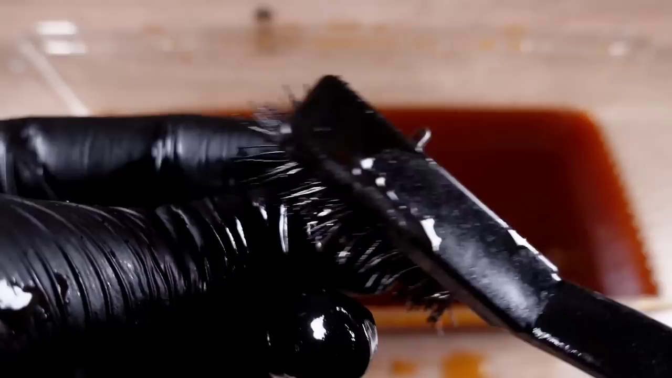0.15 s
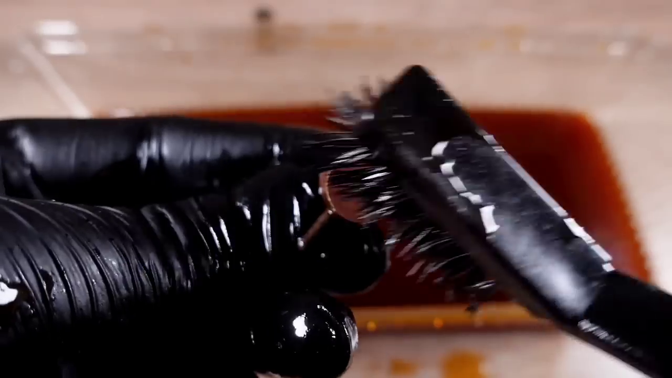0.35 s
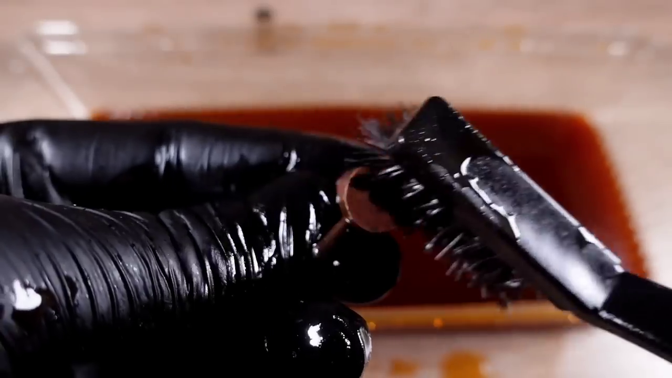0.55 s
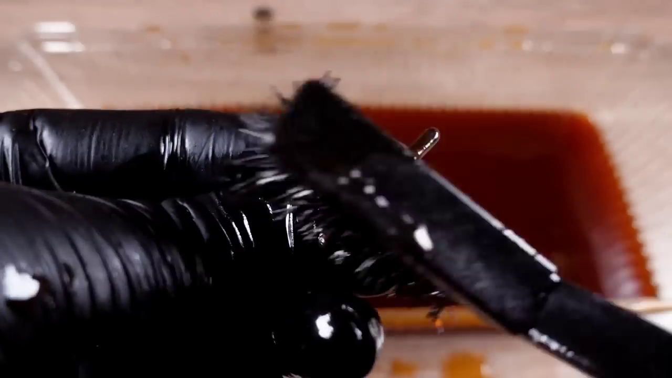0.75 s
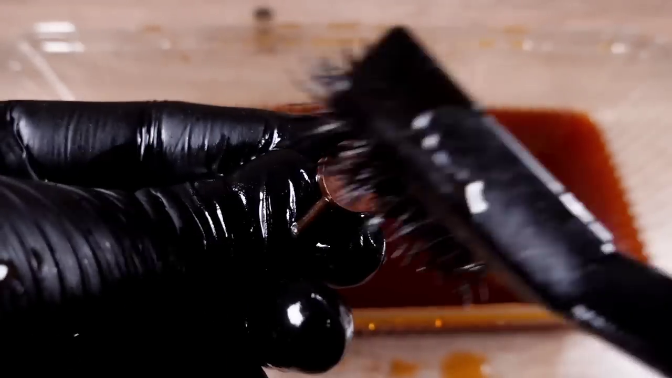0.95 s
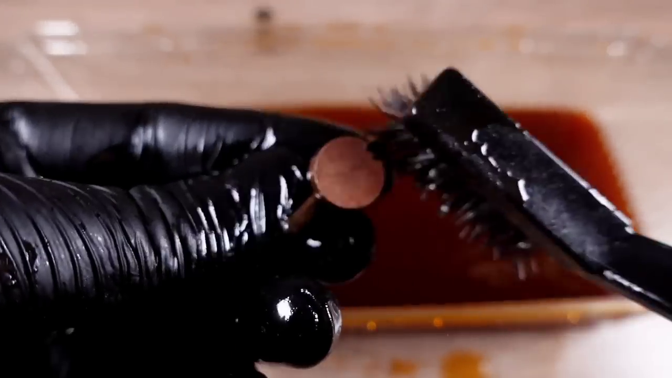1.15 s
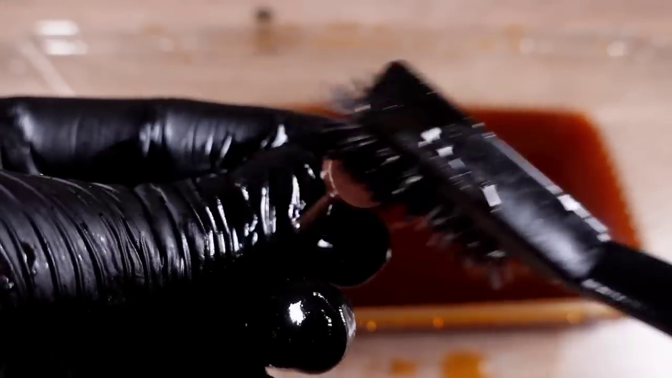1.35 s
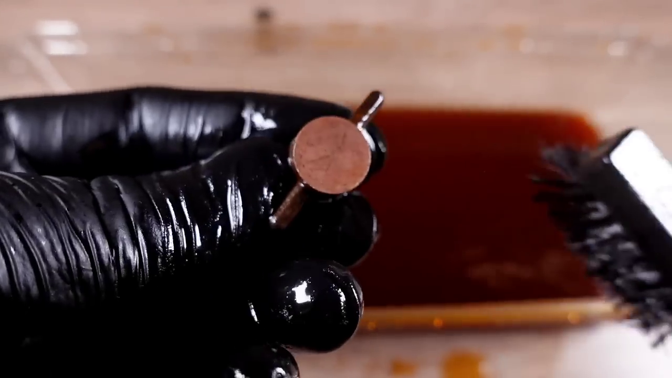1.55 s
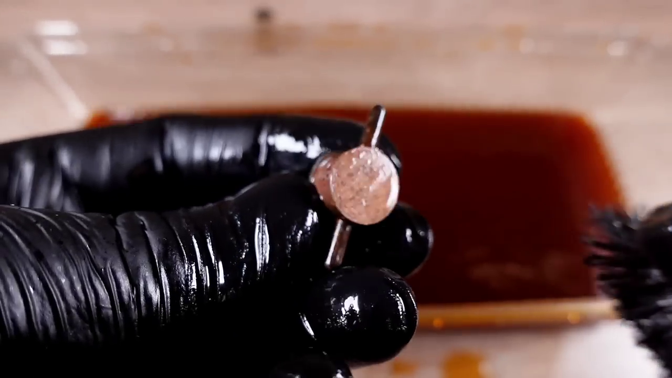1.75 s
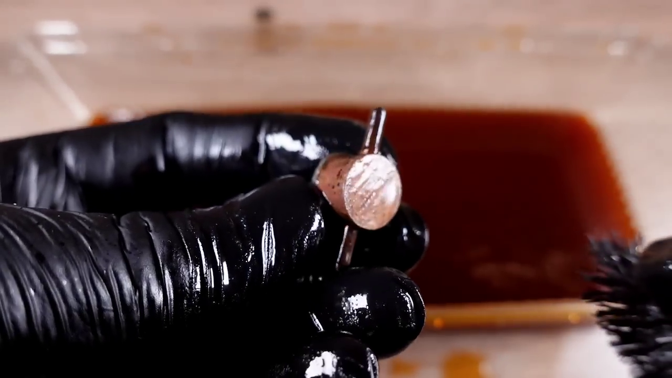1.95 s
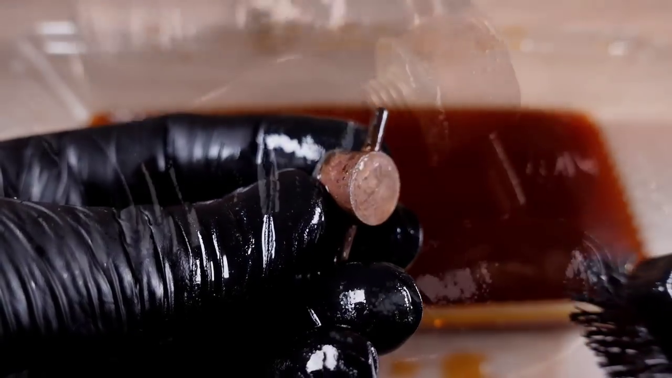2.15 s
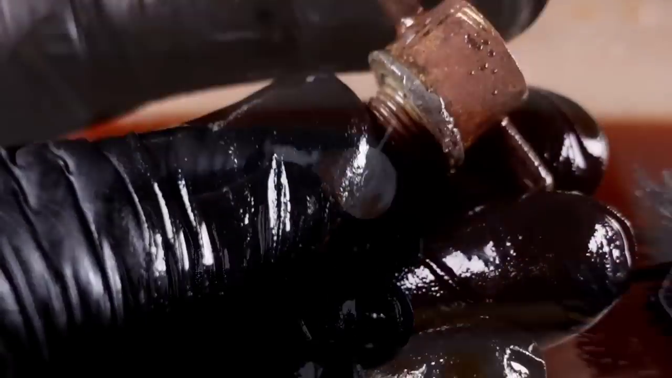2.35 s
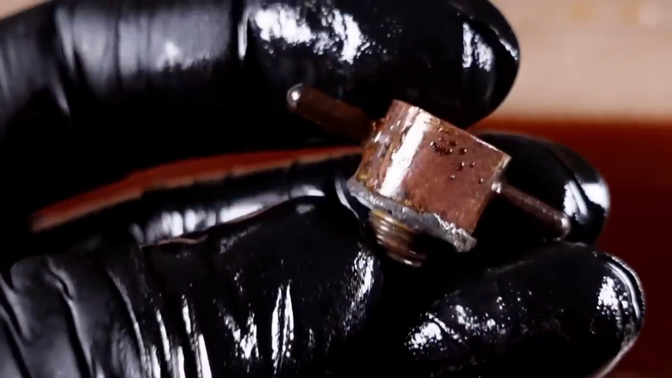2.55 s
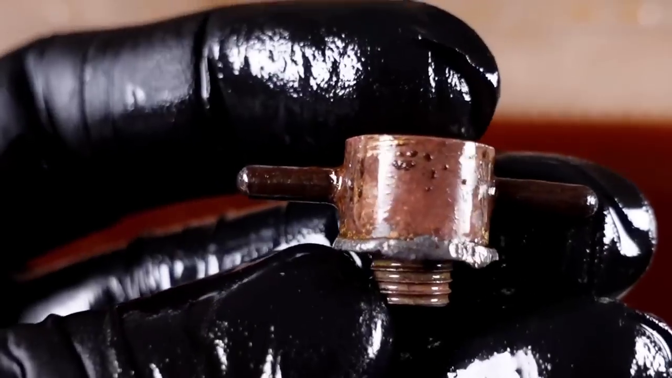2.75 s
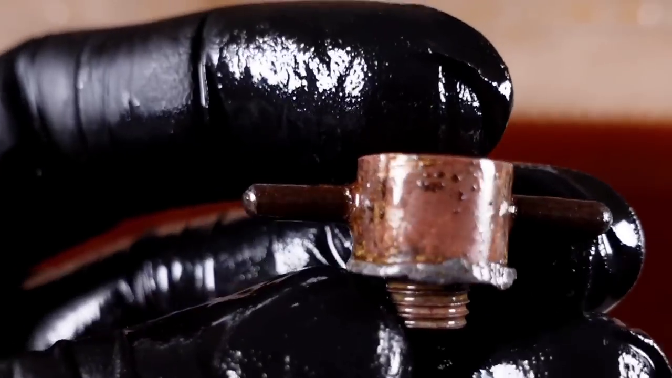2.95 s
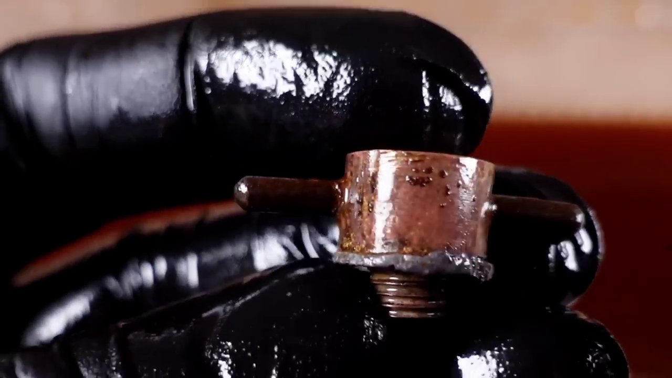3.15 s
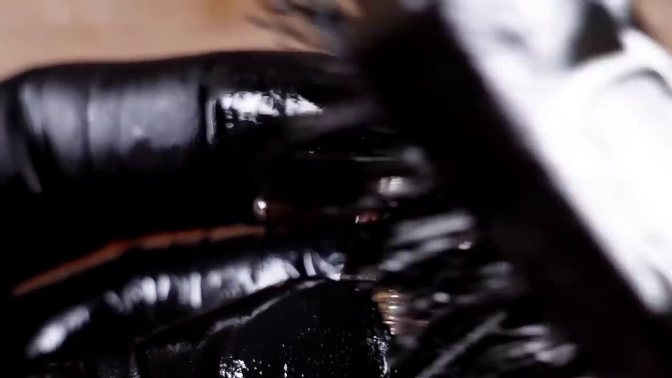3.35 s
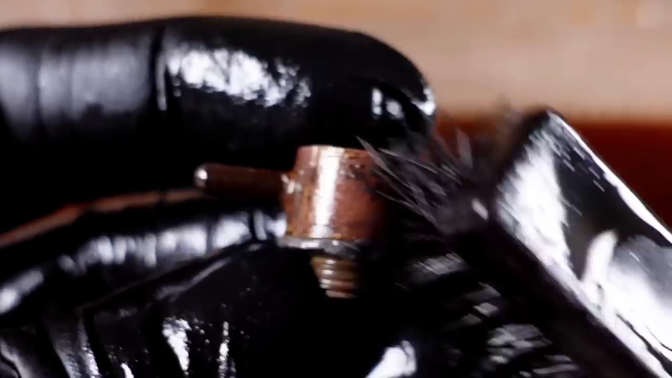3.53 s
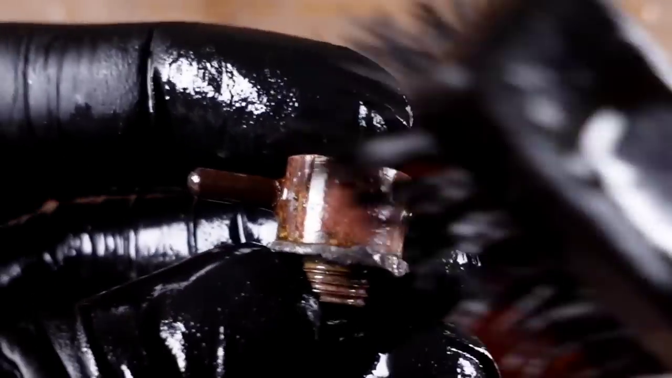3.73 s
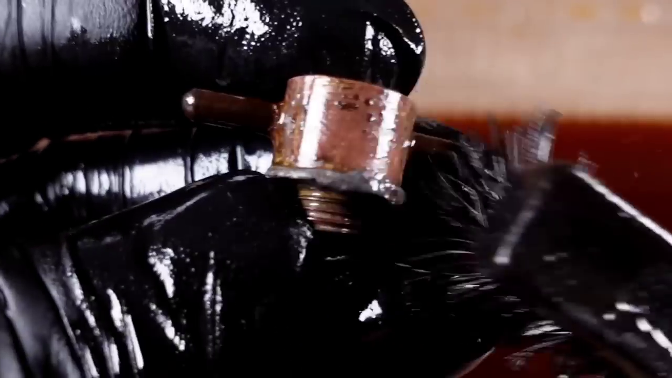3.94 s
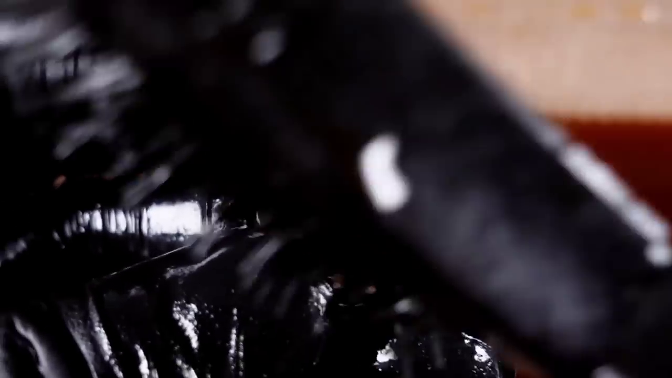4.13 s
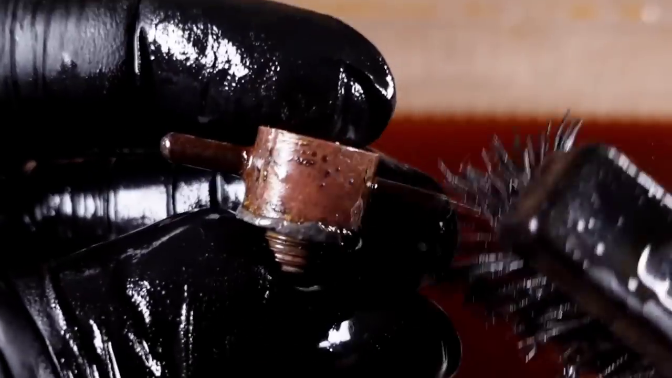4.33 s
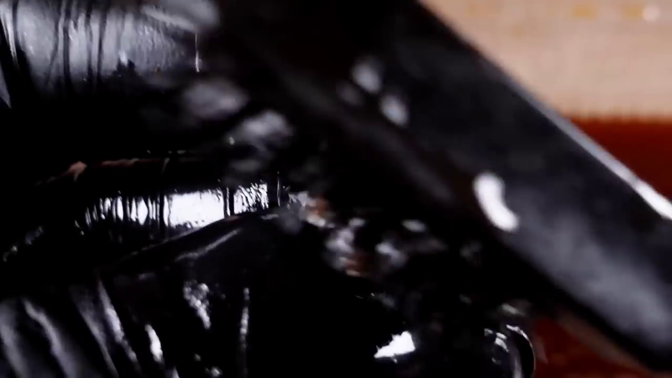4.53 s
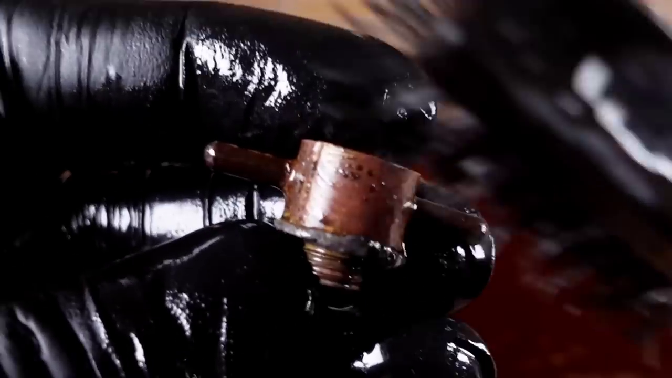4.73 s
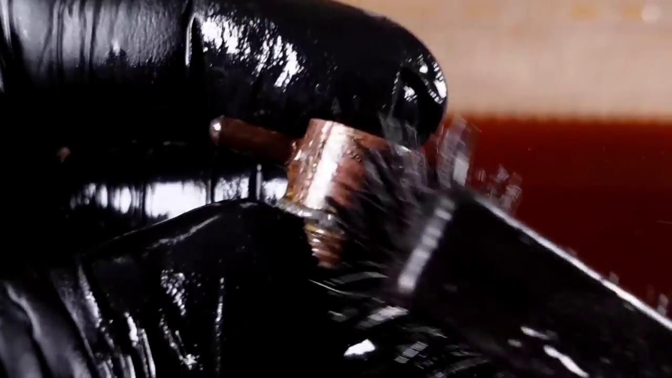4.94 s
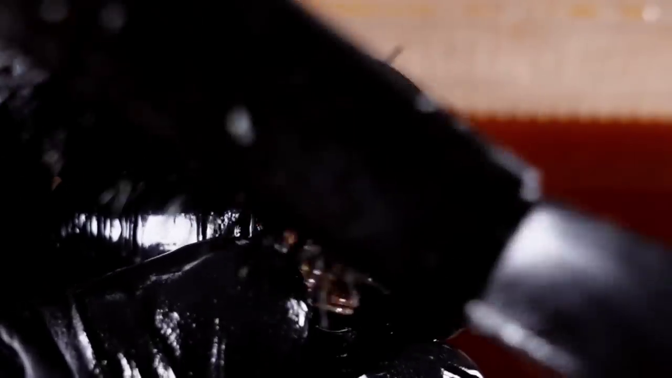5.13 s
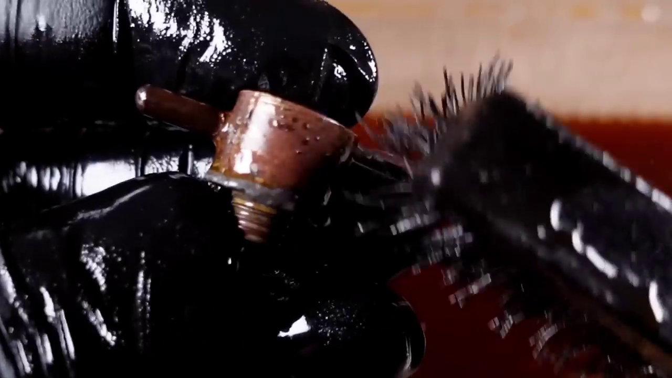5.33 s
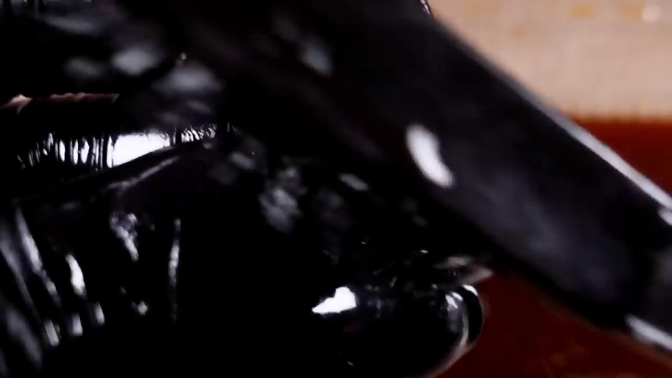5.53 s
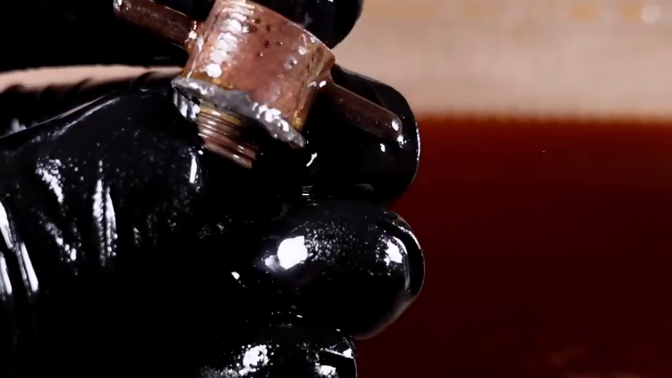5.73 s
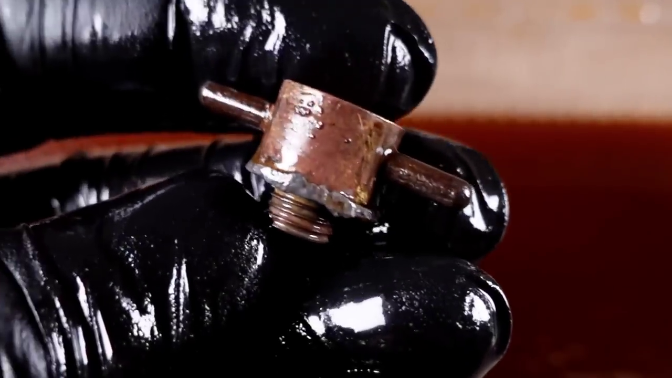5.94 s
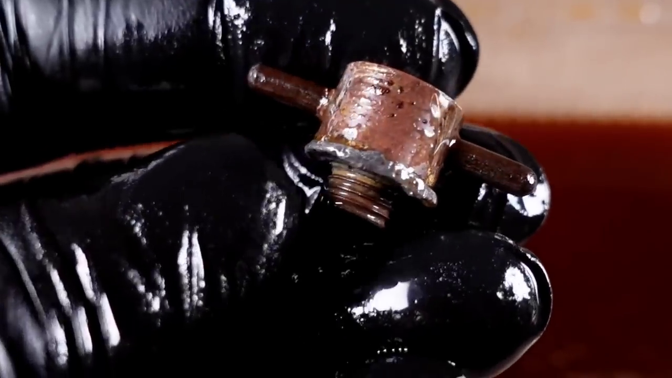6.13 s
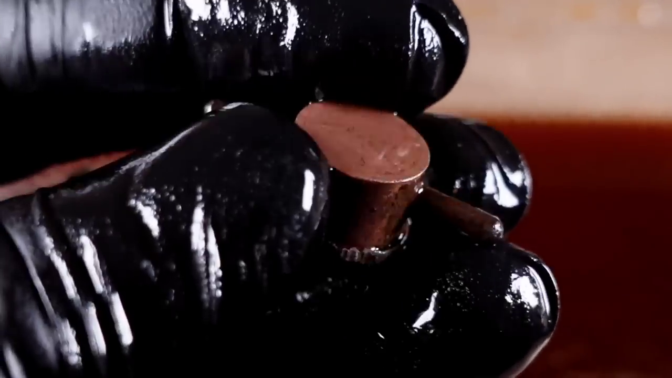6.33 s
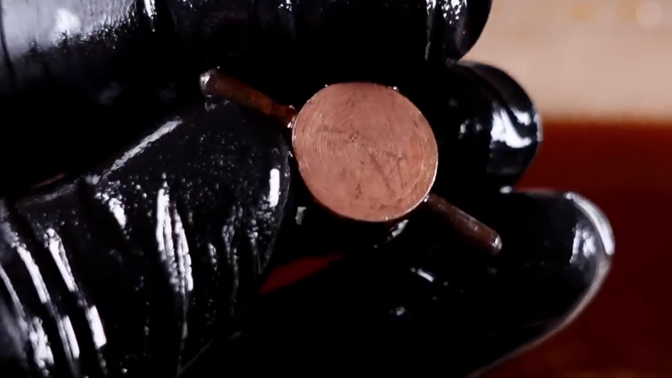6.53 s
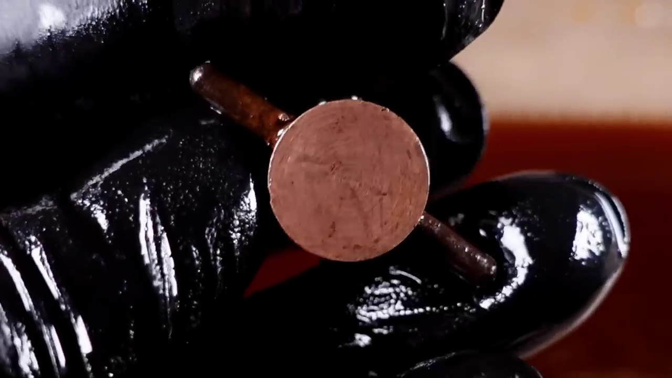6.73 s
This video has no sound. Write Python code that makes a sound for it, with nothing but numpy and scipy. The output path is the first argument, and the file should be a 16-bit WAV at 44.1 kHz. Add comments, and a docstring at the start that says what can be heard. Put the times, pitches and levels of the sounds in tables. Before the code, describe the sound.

A stiff wire brush scrubs a small wet metal part in two runs of quick, bright, crackly strokes, with faint rubber glove squeaks in a quiet workshop.

```python
"""Close, bright brush strokes come first: a hand wire brush scrubs a small wet brass part held in a rubber glove.
Two runs of quick strokes: the wire tips stick and slip in dense clicks, and bent tufts ring lower off the edge.
The wet glove squeaks faintly, single wires tick or snap and chatter, and the brush head knocks once at the end.
A short noise tail makes the room; rumble, hiss, hum and a swelling drone of filtered noise lie underneath."""
import sys
import numpy as np
from scipy import signal
from scipy.fft import rfft, irfft
from scipy.io import wavfile
from scipy.ndimage import uniform_filter1d

SR = 44100
rng = np.random.default_rng(int(sys.argv[2]) if len(sys.argv) > 2 else 0)


def materialize(psi):
    """Save the field psi as 16-bit PCM at rate SR to the path in sys.argv[1].

    A 1-D psi becomes a single channel; in a 2-D psi each row is a channel.
    """
    bounded = np.clip(np.atleast_2d(psi).T, -1, 1)
    quanta = np.round(bounded * 32767).astype(np.int16)
    wavfile.write(sys.argv[1], SR, quanta)


N = 303849
TIME = np.arange(N) / SR
TOP_HZ = 15750  # top of the sound
FIRM_DB = -38.5  # level of a firm push


def undb(db):
    """Decibels to gain."""
    return 10 ** (np.asarray(db) / 20)


def unit(x):
    """Scale to rms 1."""
    return x / np.sqrt(np.mean(x ** 2))


def colour(x, spectrum, modes=(), size=4096):
    """Causal minimum-phase filter: a smooth spectrum with resonances standing on it."""
    f = np.maximum(np.arange(size // 2 + 1) * SR / size, 1)
    hz, db = np.transpose(spectrum)
    db = np.interp(np.log(f), np.log(hz), db)
    for centre, width, lift in modes:
        db = db + lift / (1 + (2 * (f - centre) / width) ** 2)
    # folding the cepstrum forward in time makes the filter causal
    cepstrum = irfft(np.log(undb(db)))
    cepstrum[1:size // 2] *= 2
    cepstrum[size // 2 + 1:] = 0
    impulse = irfft(np.exp(rfft(cepstrum)))
    return signal.fftconvolve(x, impulse)[:len(x)]


def resonate(x, hz, width):
    """One resonance, gain 1 at its centre."""
    b, a = signal.iirpeak(hz, hz / width, fs=SR)
    return signal.lfilter(b, a, x)


def narrow_noise(hz, width):
    """Noise passed twice through one resonance for steep sides, rms 1."""
    once = resonate(rng.standard_normal(N), hz, width)
    return unit(resonate(once, hz, width))


def walk(rate, size=16384):
    """Smooth random motion through `rate` random points a second, spread near 1."""
    return np.interp(TIME * rate, np.arange(size), rng.standard_normal(size))


# Brush strokes, from first touch through bite and slide to the edge; levels drive the clicks.
# Columns: touch_s, push_s (touch to bite), slide_s (bite to edge),
# tips_touch_db, tips_bite_db, tips_edge_db, tufts_edge_db
BRUSH_STROKES = [(-.05, 0.064, 0.026, -49, -37.5, -40, -55.5),
                 (.26, 0.062, 0.015, -51.5, -37.5, -41.5, -50), (.56, .06, 0.051, -51.5, -43, -43.5, -52),
                 (.856, 0.056, 0.015, -53.5, -37.5, -41.5, -50.5),
                 (1.131, 0.064, 0.029, -50, -39, -45.5, -52.5), (1.385, 0.052, 0.029, -50.5, -37, -37, -48),
                 (3.545, 0.077, 0.044, -53.5, -39.5, -46, -43),
                 (3.939, 0.069, 0.041, -52.5, -38.5, -47, -42),
                 (4.272, 0.063, 0.054, -53.5, -37, -44.5, -37.5), (4.6, 0.038, 0.063, -57, -37, -45, -34.5),
                 (4.932, .04, .082, -51.5, -37.5, -44, -41.5), (5.27, .054, 0.06, -54, -34.5, -48, -41),
                 (5.578, 0.066, 0.039, -54, -33.5, -42.5, -34.5)]
TUFTS_UNDER_DB = 5  # tufts under the tips up to the bite
APPROACH_DB_PER_S = 1000  # the outermost wires graze the part just before the touch
BITE_DB, CATCH_S = 5, 0.011  # the last jump as the wires catch
SETTLE_S = 0.06  # after the bite the tips settle into sliding
TIPS_RELEASE_DB_PER_S, TUFTS_RELEASE_DB_PER_S = 580, 558
SURGE_HZ, SURGE_DB = 69.75, 2.3  # rows of wires pass unevenly


def stroke_levels():
    """Gains of tips and tufts: the push builds, the wires bite, slide on to the edge and are released."""
    tips, tufts = np.zeros(N), np.zeros(N)
    for touch, push, slide, touch_db, bite_db, edge_db, tuft_db in BRUSH_STROKES:
        t = TIME - touch
        stages = [0, max(push - CATCH_S, 0), push, push + slide]
        build = np.array([touch_db, bite_db - BITE_DB, bite_db])
        approach = APPROACH_DB_PER_S * np.clip(t, -1, 0)
        past_edge = np.clip(t - push - slide, 0, 1)
        # 0 at the bite, 1 at the edge, fastest at first
        settled = np.expm1(-np.clip(t - push, 0, slide) / SETTLE_S) / np.expm1(-slide / SETTLE_S)
        tips_db = np.interp(t, stages[:-1], build) + (edge_db - bite_db) * settled
        tufts_db = np.interp(t, stages, [*(build - TUFTS_UNDER_DB), tuft_db])
        tips += undb(approach + tips_db - TIPS_RELEASE_DB_PER_S * past_edge)
        tufts += undb(approach + tufts_db - TUFTS_RELEASE_DB_PER_S * past_edge)
    surge = undb(SURGE_DB * walk(SURGE_HZ))
    return tips * surge, tufts * surge


def slips(force, rate, spread_db, bunch_hz, bunch_db, low_hz, high_hz, crack, recruit, count=10, size=16000):
    """Stick-slip clicks of wires of many lengths, each with its own brief ring; neighbours let go in bunches."""
    out = np.zeros(N)
    # a light touch catches a few wires, which tick singly; a hard push brings in the whole brush
    touching = np.clip(force / undb(FIRM_DB), .02, 1) ** recruit
    for hz in np.geomspace(low_hz, high_hz, count):
        when, luck, strength, side = rng.random((size, 4)).T
        at = (when * N).astype(int)
        # at a firm push, all wire lengths together slip `rate` times a second
        slipped = luck < touching[at] * rate / count * N / SR / size
        # most slips are small, a few are much stronger
        sizes = undb(-spread_db * np.log(strength + .015)) * np.sign(side - .5)
        clicks = np.bincount(at, sizes * slipped, N)
        out += crack * clicks + resonate(clicks, hz, hz / 5)
    out *= undb(bunch_db * walk(bunch_hz))
    # even out the level over a short window, so loudness follows the force
    nearby_power = uniform_filter1d(out ** 2, size=1000)
    return force * out / np.sqrt(nearby_power + 1e-4)


# Tone of the wire tips, bright and scooped. Columns: freq_hz, gain_db (before the layer trim)
TIP_TONE = [(120, -6.5), (400, 1), (700, -3), (1200, -7.5), (2400, -1.5), (3500, -2.5), (4600, -17.5),
            (6000, -7.5), (8000, -2.5), (11000, -2), (14000, -4), (16000, 4)]
# Tone of the bent tufts, strongest in the middle. Columns: freq_hz, gain_db (before the layer trim)
TUFT_TONE = [(200, -20), (900, -8.5), (2300, -6), (3300, -3), (4400, -4), (6000, -1.5), (7500, -5.5),
             (10000, -6.5), (16000, -17)]


def brush(tip_force, tuft_force):
    """Tips hiss across the face of the part; bent tufts rattle lower as they clear its edge."""
    tips = slips(tip_force, rate=12000, spread_db=4.0, bunch_hz=400.5, bunch_db=3.5,
                 low_hz=6530, high_hz=14900, crack=0.42, recruit=.8)
    tufts = slips(tuft_force, rate=5000, spread_db=5.0, bunch_hz=257.3, bunch_db=0.0,
                  low_hz=3800, high_hz=7500, crack=0.5, recruit=.7)
    return undb(-3.0) * colour(tips, TIP_TONE) + undb(-4.0) * colour(tufts, TUFT_TONE)


# Resonances of brush head and part, heard in every wire contact. Columns: freq_hz, width_hz, lift_db
BODY_MODES = [(937, 160, 10.5), (1505, 360, 8.5), (2066, 97, 7), (2730, 160, 4.5), (3180, 100, 5),
              (3710, 310, 9), (4424, 273, 11.5), (4740, 220, 10.5), (5450, 430, 8), (5860, 180, 3),
              (6480, 500, 8), (7330, 370, 8), (8110, 1040, 5), (9260, 110, 7), (10060, 440, 9),
              (10850, 310, 7.5), (11450, 430, 6.5), (12370, 670, 6.5), (12800, 210, 5), (14250, 540, 9.5)]


def brush_body(wires):
    """Brush head and part ring along with the wires, on an otherwise flat spectrum."""
    return colour(wires, [(20, 0), (20000, 0)], BODY_MODES)


# Tone of the room noise, heavy at the bottom. Columns: freq_hz, relative_level_db
AIR_TONE = [(12, -32.5), (20, -0.5), (36, -1), (77, -13), (110, -11), (168, -18), (248, -20), (310, -26.5),
            (357, -22.5), (410, -26), (642, -26.5), (802, -30), (4300, -36.5), (5530, -37.5), (16000, -45)]
AIR_DB = -57.76
# Swells of the low drone. Columns: middle_s, length_s (between the points at 1/e), level_db
DRONE_SWELLS = [(1.997, 0.25, -67), (2.418, 0.32, -61.5), (2.946, .15, -66), (5.202, 0.48, -62),
                (5.813, 0.57, -63)]
DRONE_REST_DB, RUMBLE_DB, HUM_DB = -73, -69.5, -72
HANDS_DB, HANDS_UNTIL_S, HANDS_FADE_S = -63.5, 1, 0.34  # the hands shake the bench in the first strokes


def workshop():
    """Rumble and faint hiss, a steady hum, and a drone that comes and goes: all filtered noise."""
    air = undb(AIR_DB) * unit(colour(rng.standard_normal(N), AIR_TONE, size=16384))
    hands = undb(HANDS_DB) * np.clip(1 - (TIME - HANDS_UNTIL_S) / HANDS_FADE_S, 0, 1)
    rumble = np.hypot(undb(RUMBLE_DB), hands) * narrow_noise(64.0, 107)
    hum = undb(HUM_DB) * narrow_noise(105.2, 23.0)
    swell = sum(undb(db) * np.exp(-(2 * (TIME - s) / length) ** 2) for s, length, db in DRONE_SWELLS)
    drone = np.hypot(undb(DRONE_REST_DB), swell) * narrow_noise(247.5, 64)
    return air + rumble + hum + drone


def room(x, low_decay_s=0.28, high_decay_s=0.24, split_hz=7000, gap_s=0.0037):
    """Dense short echoes of bench and walls; the treble dies first."""
    t = TIME[:SR // 2]
    echoes = rng.standard_normal(len(t)) * (t > gap_s)
    low = signal.sosfilt(signal.butter(2, split_hz, fs=SR, output="sos"), echoes)
    # each part falls to 0.0012 of its amplitude in its decay time
    tail = low * 0.0012 ** (t / low_decay_s) + 0.63 * echoes * 0.0012 ** (t / high_decay_s)
    return signal.fftconvolve(x, tail / np.sqrt(np.sum(tail ** 2)))[:N]


# Squelches and rubs of wet rubber.
# Columns: middle_s, length_s (between the points at 1/e), pitch_hz, width_hz, level_db (before the layer trim)
GLOVE_RUBS = [(0.083, 0.047, 520, 110, -61), (0.098, 0.19, 890, 600, -68.5), (.315, 0.089, 433, 220, -58.5),
              (0.44, 0.033, 830, 600, -62), (.759, 0.02, 890, 500, -64.5), (.914, 0.053, 447, 240, -57),
              (.995, 0.038, 680, 110, -63), (1.132, .025, 688, 80, -59.5), (1.194, 0.047, 330, 350, -57),
              (1.289, .02, 690, 150, -62), (1.502, 0.04, 935, 500, -62.5), (2.405, .015, 5070, 800, -66),
              (2.457, .022, 10300, 1500, -66), (2.531, .07, 5800, 900, -75), (2.972, .1, 5300, 1200, -75.5),
              (3.712, .05, 700, 120, -67), (4.84, .06, 2280, 160, -71), (4.841, .09, 3190, 180, -72),
              (5.144, .04, 940, 890, -61), (5.47, .05, 3200, 200, -74.5), (6.293, 0.026, 5760, 1500, -66.5),
              (6.38, .07, 5470, 300, -76), (6.83, .07, 5000, 1500, -73.5)]


def glove(grains_per_s=700, size=16384):
    """Wet rubber peels off the part in tiny grains that ring small pockets of air and liquid."""
    out, t = np.zeros(N + 2 * size), TIME[:size] - TIME[size // 2]
    for s, length, hz, width, db in GLOVE_RUBS:
        # sparse grains over a faint steady rub
        grains = rng.standard_normal(size) * (0.084 + (rng.random(size) < grains_per_s / SR))
        ring = unit(resonate(resonate(grains, hz, width), hz, 2 * width))
        swell = np.exp(-(2 * t / length) ** 2)
        start = int(s * SR) + size // 2
        out[start:start + size] += undb(db) * swell * ring
    return out[size:size + N] * undb(1.0)


STRAY_EARLY_S, STRAY_LATE_S = .035, .04  # they reach beyond the first touch and the edge
STRAY_DB, STRAY_SPREAD_DB = -22, 4.5  # energy at a firm push before the snap trim, and its scatter
STRAY_FOLLOW = 0.64  # dB of snap per dB of push
SHORT_WIRE_HZ, LONG_WIRE_HZ, WIRE_SPREAD, STRAY_CHATTER = 10400, 5260, 0.13, 0.58


def stray_snaps(tip_force, tuft_force, count=7):
    """Lesser snaps scattered through each stroke, stronger under more push; long wires go with the tufts."""
    rows = []
    for touch, push, slide, *_ in BRUSH_STROKES:
        places = (np.arange(count) + rng.random(count)) / count
        times = touch - STRAY_EARLY_S + places * (STRAY_EARLY_S + push + slide + STRAY_LATE_S)
        for s, (strength, length) in zip(times, rng.standard_normal((count, 2))):
            if s > 0:
                i = int(s * SR)
                push_db = 20 * np.log10(max(tip_force[i], tuft_force[i]))
                db = STRAY_DB + STRAY_FOLLOW * (push_db - FIRM_DB) + STRAY_SPREAD_DB * strength
                wire_hz = SHORT_WIRE_HZ if tip_force[i] > tuft_force[i] else LONG_WIRE_HZ
                hz = min(wire_hz * np.exp(WIRE_SPREAD * length), TOP_HZ)
                rows.append((s, db, hz, STRAY_CHATTER))
    return rows


# Wires that stand out: lone ticks at first contact, and snaps as wires spring free.
# Columns: start_s, energy_db (before the layer trim), pitch_hz, chatter (share, 0 to 1)
SINGLE_WIRES = [(.2272, -35, 4700, .3), (.2654, -22, 10700, .15), (.2814, -19, 10100, .1),
                (.301, -23, 10100, .5), (.5116, -36, 7500, .3), (.5658, -18.5, 11700, 0.14),
                (.5998, -19, 12100, .5), (.6637, -18, 11500, .6), (.7188, -31, 9600, .1),
                (.8328, -33, 11300, .3), (.8623, -21, 11000, .3), (1.1335, -29, 7300, 0.47),
                (1.292, -29.5, 12500, 0.41), (1.3905, -21.5, 8400, .2), (1.4386, -11, 4800, 0.43),
                (3.606, -18, 7200, .15), (3.6196, -10, 10700, .6), (3.6585, -18.5, 4070, 0.16),
                (3.9354, -21.5, 11300, .13), (4.0798, -30, 4680, 0.27), (4.259, -34, 9000, .6),
                (4.2775, -26, 11600, .2), (4.291, -10.5, 11000, 0.14), (4.3401, -12, 12500, .4),
                (4.3826, -11, 4830, 0.2), (4.5866, -33, 5300, 0.54), (4.6335, -3.5, 12100, 0.58),
                (4.65, -5.5, 10300, 0.84), (4.6872, -7.5, 4800, 0.18), (4.9164, -19, 8200, 0.28),
                (4.9376, -14.5, 11200, .35), (4.9653, -5.5, 12100, .7), (5.0451, -14, 4730, 0.17),
                (5.0674, -16, 4770, 0.17), (5.0862, -19, 4800, 0.17), (5.1038, -24, 10980, .45),
                (5.253, -22, 7000, .8), (5.273, -19, 10200, .4), (5.3205, -3.5, 10800, 0.94),
                (5.3374, -17, 7000, .1), (5.574, -26, 5900, 0.37), (5.5976, -25, 10500, .2),
                (5.6338, -5.5, 10200, 0.12), (5.6475, -4, 13500, 0.36), (5.6864, -3, 4440, .36)]
# Tone of a tick or snap, bright. Columns: freq_hz, relative_level_db
SNAP_TONE = [(200, -19), (900, -10.5), (2300, -10.5), (4000, -3.5), (8000, 0.5), (16000, -2.5)]


def snaps(rows, width_hz=3000, crack=0.17, chatter_s=0.0058, size=1024):
    """A wire ticks or springs free with one click, then chatters against its neighbours: the more, the longer."""
    out, t = np.zeros(N + size), TIME[:size]
    for s, db, hz, chatter in rows:
        push = chatter * rng.standard_normal(size) * np.exp(-t / (chatter * chatter_s))
        push[0] = 1  # the click
        ring = colour(crack * push + resonate(push, hz, width_hz), SNAP_TONE, size=size)
        start = int(s * SR)
        out[start:start + size] += undb(db) * ring / np.sqrt(np.sum(ring ** 2))
    return undb(-6.5) * out[:N]


def knock(at_s=5.687, hz=1000, width_hz=350, decay_s=0.0076, db=-46):
    """The brush head bumps the part as it leaves it for the last time, damped by the hand."""
    t = TIME - at_s
    return undb(db) * (t > 0) * np.exp(-np.abs(t) / decay_s) * narrow_noise(hz, width_hz)


def scene():
    """The work at the bench, its echo and the room around it."""
    forces = stroke_levels()
    wires = brush(*forces) + snaps(SINGLE_WIRES + stray_snaps(*forces))
    handling = glove() + knock()
    near = brush_body(wires) + handling
    # the room gathers the sound of all directions, so the resonances even out in its tail
    echo = undb(-11.5) * room(wires + handling)
    return (near + echo + workshop())[None]


def record(dry):
    """A steep low-pass cuts the top."""
    return signal.sosfilt(signal.ellip(10, .2, 70, TOP_HZ, fs=SR, output="sos"), dry)


dry = scene()
out = record(dry)
materialize(out)
```